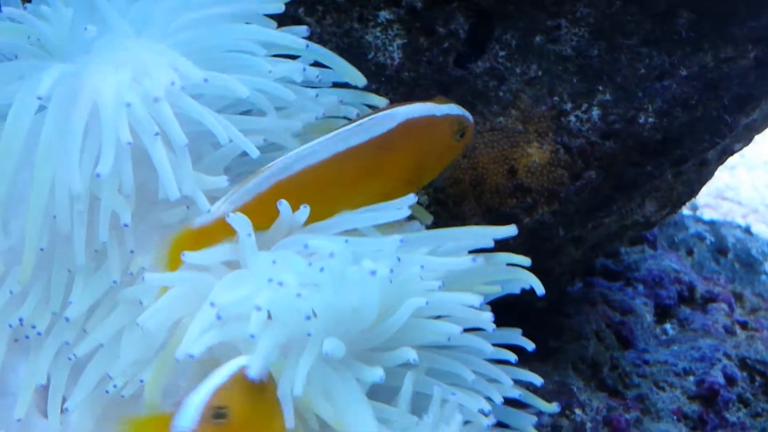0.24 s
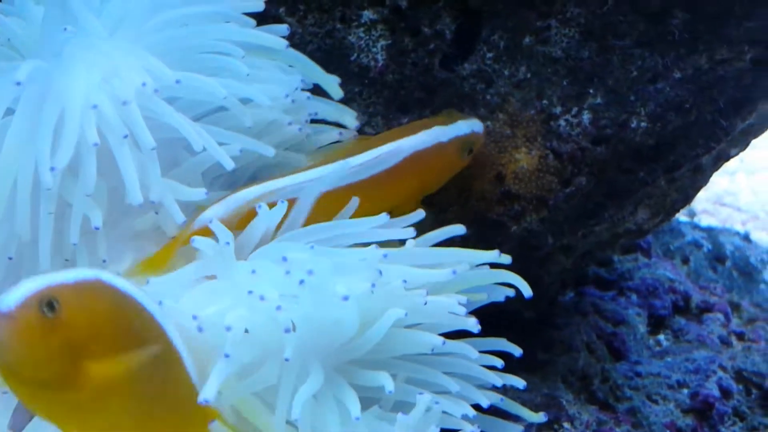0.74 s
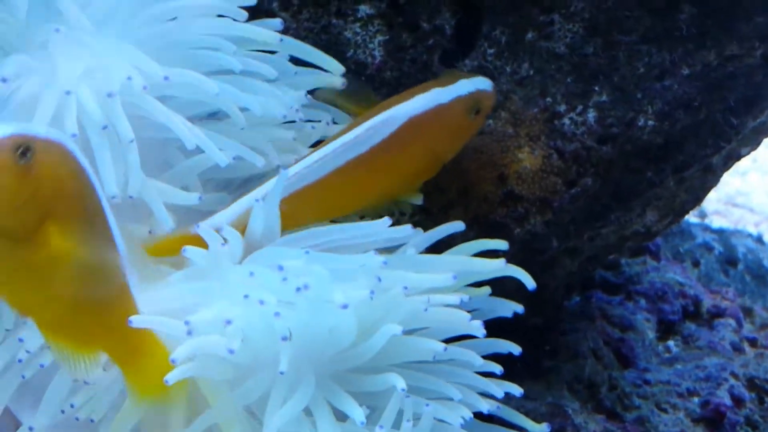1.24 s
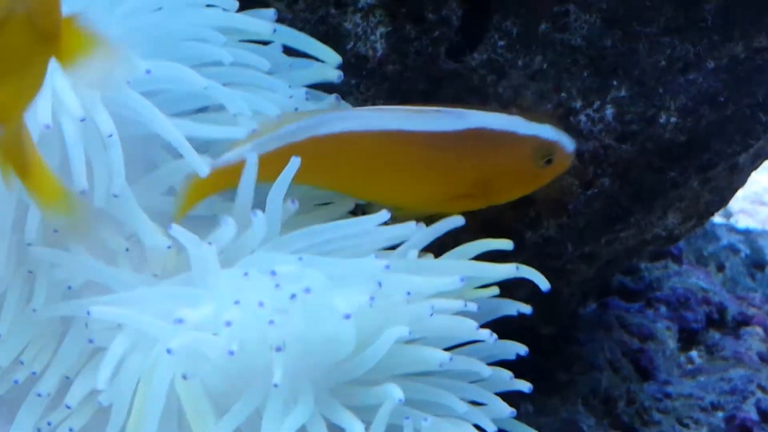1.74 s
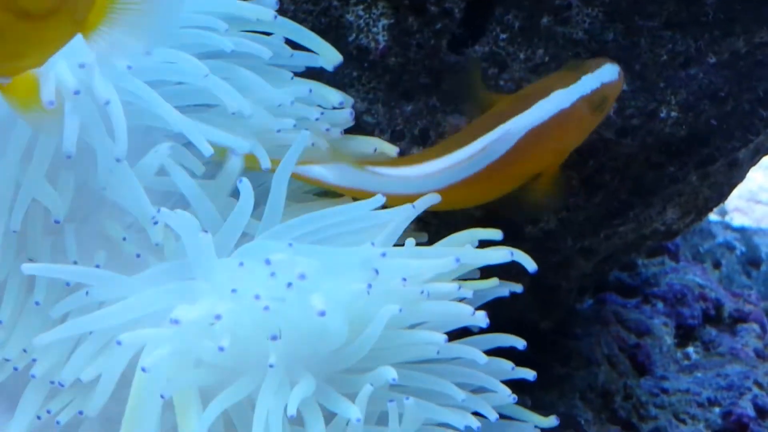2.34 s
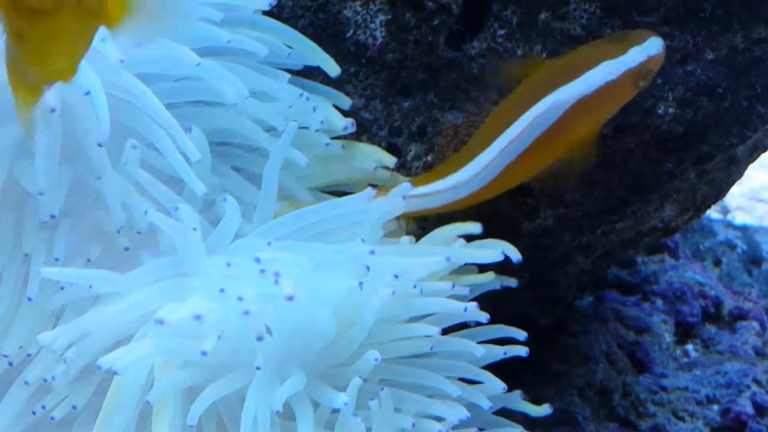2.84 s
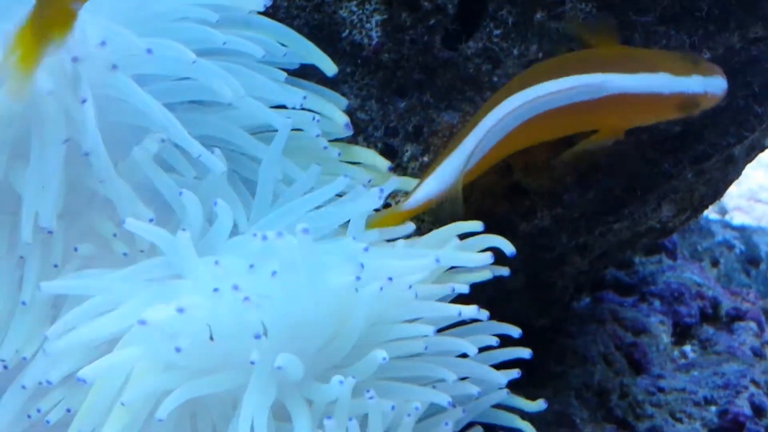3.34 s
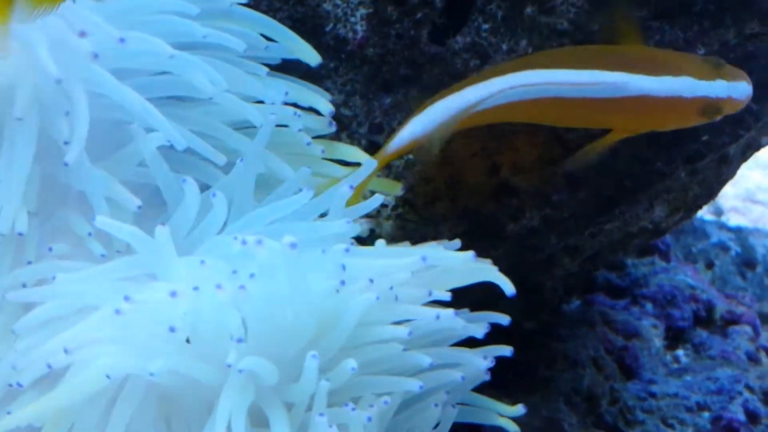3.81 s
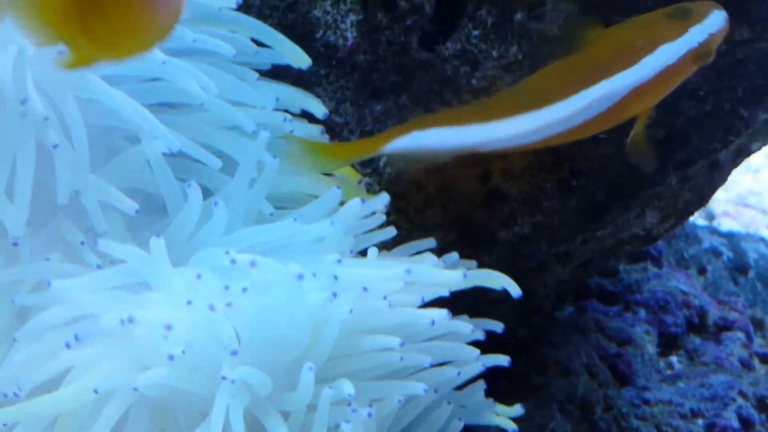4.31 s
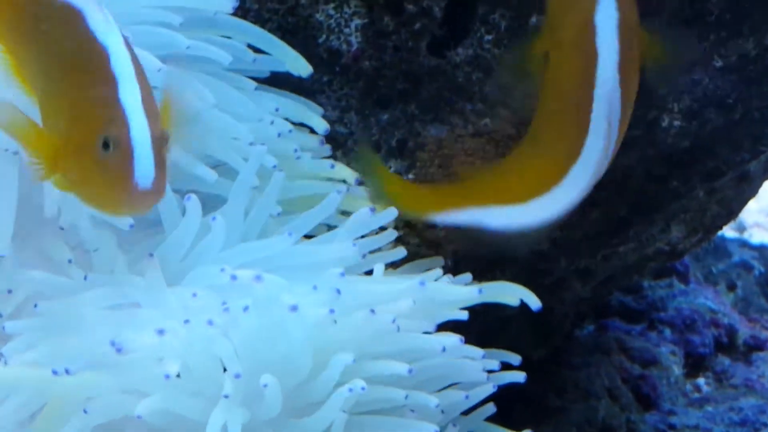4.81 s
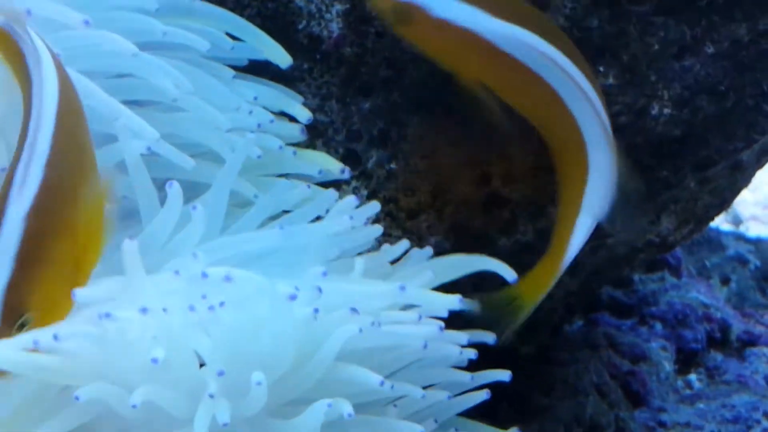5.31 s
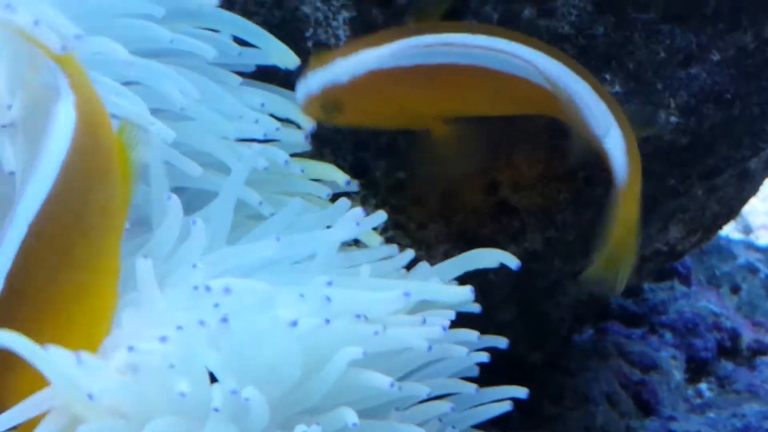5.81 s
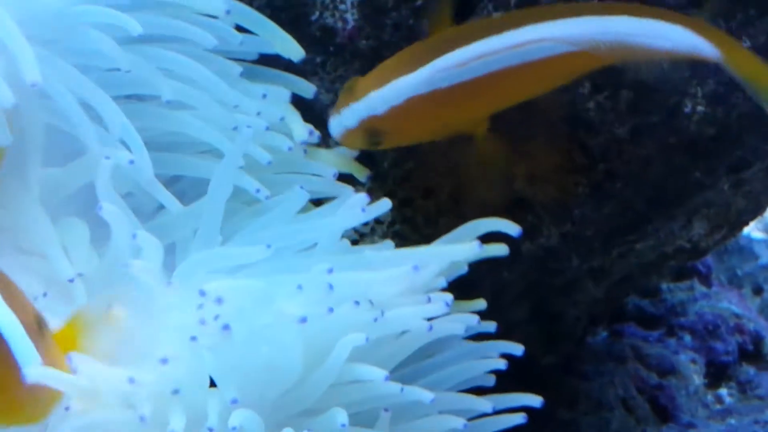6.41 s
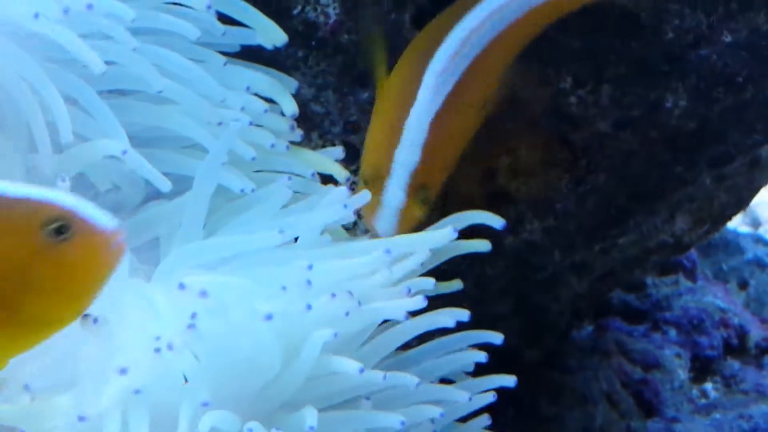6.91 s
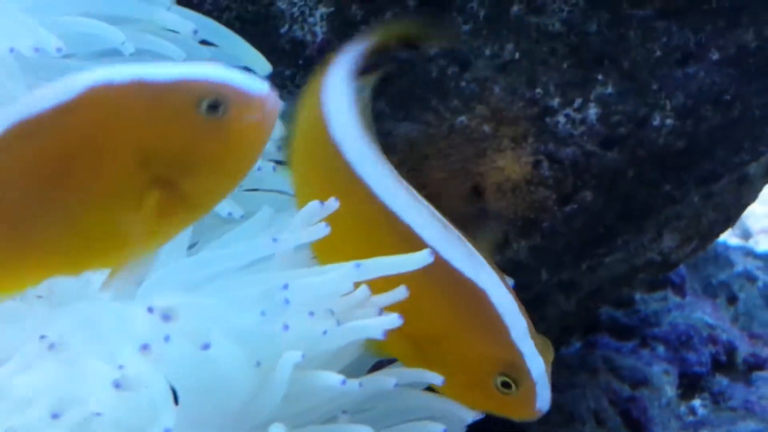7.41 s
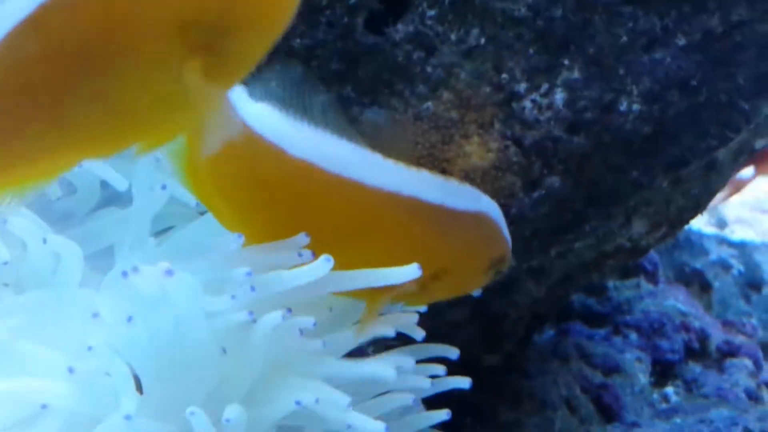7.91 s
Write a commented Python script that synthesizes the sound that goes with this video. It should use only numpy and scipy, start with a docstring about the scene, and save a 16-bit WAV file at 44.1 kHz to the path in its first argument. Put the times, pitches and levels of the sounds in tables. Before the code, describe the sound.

Sharp little clicks from a small mechanism sound near the microphone on the right, a few each second, in two uneven runs with a gap between. Behind them a fish tank's pump drones throughout, low and pulsing. Circulating water adds a soft rumble, a fine fizz and tiny scattered spits of spray, with a single faint bubble ping near the end of the first run. The pump and water carry on after the clicking ends.

```python
"""A running aquarium, up close

A mains pump hums, and the tank drones a few Hz above the hum's fourth harmonic, so the two throb.
Returning water rumbles, fizzes and spits at the surface, and one larger bubble pings faintly.
Close by on the right, a small mechanism makes dry little ticks as a part snaps inside its casing."""
import sys
import numpy as np
from scipy import signal
from scipy.fft import rfft, irfft
from scipy.io import wavfile

SR = 44100
rng = np.random.default_rng(int(sys.argv[2]) if len(sys.argv) > 2 else 0)


def master(y):
    """Save y as 16-bit WAV."""
    cut = np.clip(np.atleast_2d(y).T, -1, 1)
    pcm = np.round(cut * 32767)  # scale
    wavfile.write(sys.argv[1], SR, pcm.astype(np.int16))


N = 359415
TIME = np.arange(N) / SR
FREQ = np.maximum(np.arange(N // 2 + 1) * SR / N, 1)
MAINS_HZ, TOP_HZ = 50, 14600

# rumble of water in the pump and pipes: f/Hz, level/dB per Hz
RUMBLE_SPECTRUM = [(20, -95), (52, -81.5), (66, -70), (115, -69), (170, -62), (240, -63.5), (310, -70.5),
                   (380, -77.5), (560, -79.5), (660, -82), (1600, -82), (2100, -84.5), (3000, -90.5),
                   (6000, -108)]
# pitches at which the tank and its stand ring: f/Hz, width/Hz, left/dB per Hz, right/dB per Hz
TANK_RESONANCES = [(349.7, 7.7, -69.5, -64.5), (451.7, 11, -71, -69.5), (548.3, 14.3, -71, -72),
                   (1444, 36, -73.5, -90), (2359, 64, -87.5, -80.5)]
# fizz of the falling water: f/Hz, left/dB per Hz, right/dB per Hz
FIZZ_SPECTRUM = [(1000, -108, -108), (3380, -95, -93), (4700, -86, -92), (6200, -83.5, -91.5),
                 (6360, -86.5, -87), (8000, -97.5, -89), (9050, -100.5, -89), (10500, -103, -94.5),
                 (12900, -107, -100), (14700, -107, -101)]
# the loudest spits and gurgles: t/s, left level/dB, centre f/Hz, spread/Hz, length/s
LOUD_SPITS = [(0.18, -44, 5700, 800, 0.0089), (0.224, -37, 5600, 600, 0.0064),
              (1.996, -43, 5760, 1300, 0.038), (2.66, -40.5, 6210, 2200, 0.011),
              (2.896, -41, 5000, 2570, 0.034), (2.903, -45, 2800, 900, 0.022),
              (3.067, -41, 6200, 1300, 0.0089), (3.265, -47, 1950, 250, 0.0088),
              (3.446, -43, 1940, 300, 0.008), (3.923, -40.5, 5710, 750, 0.014),
              (4.12, -43, 5700, 3000, 0.013), (4.2, -44, 5500, 2200, 0.03), (4.29, -45.5, 5800, 2600, 0.04),
              (4.41, -47, 6000, 2400, 0.04), (4.905, -42.5, 5790, 500, 0.012),
              (5.758, -41, 5500, 1397, 0.012), (5.9, -45.5, 5900, 1700, 0.03),
              (6.339, -43, 5990, 1400, 0.011), (6.755, -40.5, 4700, 1616, 0.013),
              (6.865, -43.5, 5160, 2100, 0.017), (7.777, -43, 5660, 908, 0.013)]
# one larger bubble: t/s, level/dB, starting f/Hz, time to fade by 60 dB/s
BUBBLE_PING = (1.603, -43, 3250, .25)
# ticks of the mechanism: t/s, right level/dB over 1 ms, chatter/0-1, f/Hz that chatter brings out
TICK_EVENTS = [(0.0516, -18.5, 0.9, 7700), (0.3095, -16.5, 0.16, 6600), (0.5953, -18.5, 1, 7490),
               (0.8263, -17, 0.08, 6500), (1.0914, -18.0, 0.6, 7600), (1.2206, -17, 0.2, 5670),
               (1.7658, -16.5, 0.48, 9880), (3.6704, -16.6, 0.22, 5600), (3.9785, -17, 0.6, 9900),
               (4.2671, -17.5, 0.1, 6600), (4.5697, -16, 0.9, 7700), (4.7438, -18.5, 0.1, 6600),
               (5.0127, -16, 1, 7700), (5.2125, -19, 0.1, 5500), (5.4243, -17, 1, 7520),
               (5.778, -16.5, 0.15, 5500), (6.0488, -17, 1, 7700), (6.2245, -19.5, 0.07, 5500),
               (6.4317, -16.5, 0.75, 9200)]
# pitches at which the mechanism's casing rings: f/Hz, width/Hz, relative level/dB
CASING_RESONANCES = [(4730, 4000, -0.5), (6580, 330, -3.5), (8940, 1950, 4), (13200, 3700, 2.5)]
# how the soft low tone swells and fades: t/s, relative level/dB
LOW_TONE_LEVELS = [(0, -39), (.6, -46), (1.1, -49), (1.35, -41), (2.25, -51), (2.47, -40), (2.9, -39),
                   (3.5, -48), (3.95, -47), (4.15, -40), (4.45, -40), (4.75, -53), (5.26, -38), (5.85, -41),
                   (6.35, -50), (6.76, -42), (7.6, -47), (7.9, -40)]
# the pump's hum: multiple of the mains frequency, left/dB, right/dB, left phase lead/rad
HUM_HARMONICS = [(2, -44, -46.5, -0.26), (6, -52.5, -51, -0.7), (7, -68, -64.5, -1.3),
                 (8, -57, -60.5, -0.46), (9, -62.5, -65, -1), (10, -58.5, -57.5, -0.4),
                 (12, -68, -77, -1.1), (14, -68.5, -72, -0.6), (16, -60, -66, -0.69), (17, -66, -77, -1.9),
                 (18, -60.5, -62, -2.1), (20, -63.5, -63, -0.42), (22, -73, -66, 3.5),
                 (24, -65.5, -70.5, 1)]
# whines of the pump's rotor: f/Hz, left/dB, right/dB, left phase lead/rad
ROTOR_WHINES = [(304.8, -58, -58, -.1), (360, -63, -63, -.1), (609.7, -65, -69, -.6),
                (1067, -69, -64.5, -.4), (1219.5, -65, -71, -1.7), (1321, -72, -72, -1),
                (1372, -59, -78, -2.9), (1423, -66, -79, -1.8), (1635, -76, -72, -.9),
                (1981, -75, -68, -1.5)]
# throbs a second, which is how far the drone lies above the hum's fourth harmonic: t/s, f/Hz
THROB_RATES = [(0.0, 5.6), (0.25, 6.76), (0.4, 4.42), (0.53, 9.01), (0.82, 6.58), (1.49, 7.9), (1.61, 3.21),
               (2.67, 10.02), (2.83, 2.74), (3.2, 5.25), (3.34, 9.53), (3.75, 5.26), (3.88, 9.82),
               (4.25, 4.63), (4.37, 10.05), (6.04, 6.44), (6.34, 3.57), (6.6, 10.56), (7.4, 5.29),
               (7.87, 8.01), (8.0, 2.89), (8.15, 7.37)]
# how the tank's drone swells and fades: t/s, relative level/dB
DRONE_LEVELS = [(0, -46), (.25, -35), (.45, -39.5), (.9, -36.5), (1.55, -38.5), (1.75, -45), (2.5, -37.5),
                (3.06, -33), (3.3, -38), (3.9, -37.5), (4.07, -45), (4.5, -39.5), (4.61, -33), (4.75, -41),
                (5.37, -34.5), (5.55, -46), (6.1, -40.5), (7.27, -38.5), (7.47, -43), (7.75, -35),
                (8.15, -34.5)]


def undb(db):
    """Turn decibels into a number to multiply by."""
    return 10 ** (np.asarray(db) / 20)


def resonance(freq, hz, width):
    """How something that rings at hz responds to each frequency; the gain is 1 at hz."""
    return 1 / (1 + 1j * (freq ** 2 - hz ** 2) / (freq * width))


def gain_curve(hz, db):
    """Join points of frequency and level into a gain for every frequency."""
    return undb(np.interp(np.log(FREQ), np.log(hz), db))


def shaped(noise, gain):
    """Give white noise of power 1 a spectrum, with gain in amplitude per root Hz."""
    return irfft(rfft(noise) * gain, N) * np.sqrt(SR / 2)


def wander(rate):
    """A smooth random curve, about 1 in size, that changes about rate times a second."""
    spectrum = rfft(rng.standard_normal(N // 100))
    curve = irfft(spectrum / (1 + (FREQ[:N // 200 + 1] / rate) ** 4))
    return np.interp(TIME, np.linspace(0, TIME[-1], len(curve)), curve / curve.std())


def stereo_noise(alike_hz):
    """White noise whose left and right are alike for long waves and part ways above alike_hz."""
    mid, side = rfft(rng.standard_normal((2, N)))
    likeness = .96 / (1 + (FREQ / alike_hz) ** 3)
    mid, side = mid * np.sqrt((1 + likeness) / 2), side * np.sqrt((1 - likeness) / 2)
    return irfft(np.array([mid + side, mid - side]), N)


def room(sound, fade_s, echo_db):
    """Add a short wash of echoes from the hood and walls, different on each side."""
    t = TIME[:SR // 2]
    tail = rng.standard_normal((2, len(t))) * undb(-60 * t / fade_s)
    tail /= np.sqrt((tail ** 2).sum(1, keepdims=True))
    return sound + undb(echo_db) * signal.fftconvolve(sound, tail, axes=1)[:, :N]


def water_flow(alike_hz=850, lean_db=0.58, surge_db=0.75):
    """Churning water rumbles and keeps the tank ringing."""
    rumble = shaped(stereo_noise(alike_hz), gain_curve(*np.transpose(RUMBLE_SPECTRUM)))
    rumble *= undb([[-lean_db], [lean_db]])
    tank_gain = sum(undb([[left], [right]]) * resonance(FREQ, hz, 1.55 * width) ** 2
                    for hz, width, left, right in TANK_RESONANCES)
    ringing = shaped(stereo_noise(alike_hz), tank_gain)
    return (rumble + ringing) * undb(surge_db * wander(12.3))


def fizz(flurries_per_s=16, flurry_s=0.0073, flurry_db=1, surge_db=.5, flicker_db=1.8):
    """Tiny bubbles burst too thickly to count; each size comes in its own brief flurries."""
    spectrum, surge = 0, surge_db * wander(8.7)
    # one band of noise for each bubble size
    bands = np.array([abs(resonance(FREQ, hz, hz / 5)) ** 2 for hz in np.geomspace(2000, 15000, 12)])
    bands /= np.sqrt((bands ** 2).sum(0))
    age = TIME[:SR // 10] / flurry_s
    for band in bands:
        starts = (rng.random(N) < flurries_per_s / SR) * rng.random(N)
        flurries = signal.oaconvolve(starts, age * np.exp(1 - age))[:N]
        loudness = np.sqrt(1 + undb(flurry_db) ** 2 * flurries) * undb(surge + flicker_db * wander(38))
        spectrum = spectrum + rfft(loudness * rng.standard_normal((2, N))) * band
    bubbles = irfft(spectrum, N)
    hz, left_db, right_db = np.transpose(FIZZ_SPECTRUM)
    return shaped(bubbles / bubbles.std(), np.array([gain_curve(hz, left_db), gain_curve(hz, right_db)]))


def faint_spits(count=36, level_db=-47.8, scatter_db=1.5, centre_hz=6300, octaves=.22, length_s=.012):
    """List faint spits of spray at random moments, with the same columns as LOUD_SPITS."""
    times = (np.arange(count) + rng.random(count)) / count * TIME[-1]
    louder, higher, longer = rng.standard_normal((count, 3)).T
    hz = np.minimum(centre_hz * 2 ** (octaves * higher), TOP_HZ)
    return list(zip(times, level_db + scatter_db * louder, hz, .3 * hz, length_s * 1.3 ** longer))


def spits(right_db=-5, right_db_per_octave=14):
    """Each spit is a quick swarm of like-sized bubbles; the finest are loudest on the right."""
    out, t = np.zeros((2, N)), TIME[:SR // 2]
    freq = np.maximum(np.arange(len(t) // 2 + 1) * SR / len(t), 1)
    for at_s, db, hz, spread_hz, length_s in list(LOUD_SPITS) + faint_spits():
        noise = rng.standard_normal((2, len(t)))
        swarm = irfft(rfft(noise) * resonance(freq, hz, 1.14 * spread_hz) ** 2)
        age = t / (0.5 * length_s)
        swarm *= age * np.exp(1 - age) / swarm.std()
        start = max(int((at_s - 0.46 * length_s) * SR), 0)
        gain = undb([[db], [db + right_db + right_db_per_octave * np.log2(hz / 6000)]])
        out[:, start:start + len(t)] += (gain * swarm)[:, :N - start]
    return room(out, fade_s=0.83, echo_db=-10)


def bubble_ping(onset_s=0.0077, rise=.05, rise_s=.005, flutter_db=2.8):
    """A lone bubble chirps upward as it surfaces, then rings unevenly."""
    at_s, db, start_hz, fade_s = BUBBLE_PING
    age = np.maximum(TIME - at_s, 0)
    hz = start_hz * (1 + rise * (1 - np.exp(-age / rise_s)))
    loudness = undb(db - 60 * age / fade_s) * (1 - np.exp(-age / onset_s))
    ring = loudness * np.sin(2 * np.pi * np.cumsum(hz) / SR)
    return np.array([ring * undb(flutter_db * wander(60)) for side in range(2)])


def ticks(catch_s=0.0001693, rebound_s=0.000218, rebound=0.68, vary_db=2, knock_db=-5, left_db=-5):
    """A small part catches, snaps home and may chatter; its casing rings for about a millisecond."""
    out, size = np.zeros((2, N)), 512
    freq = np.maximum(np.arange(size // 2 + 1) * SR / size, 1)
    for at_s, db, chatter, ring_hz in TICK_EVENTS:
        # five blows: the catch, the snap and three bounces
        jitter = .25 * rng.standard_normal(3)
        delays = np.r_[0, catch_s, catch_s + rebound_s * (np.arange(1, 4) + jitter)]
        blows = np.r_[.2 + .4 * chatter, 1, chatter * rebound * .8 ** np.arange(3)]
        force = blows @ np.exp(-2j * np.pi * delays[:, None] * freq)
        casing = sum(undb(ring_db + vary_db * chatter * rng.normal()) * resonance(freq, hz, width)
                     for hz, width, ring_db in CASING_RESONANCES)
        # light, chattering blows lack the low pitches and favour one ring
        lowest_hz = np.interp(chatter, [0, .5], [2650, 5200])
        low_cut = resonance(freq, lowest_hz, lowest_hz) * 1j * freq / lowest_hz
        casing *= low_cut ** 2 * (1 + 2.3 * chatter * resonance(freq, ring_hz, width=750))
        # a clean snap sounds hollow in the middle of the treble
        casing *= 1 - .65 * (1 - chatter) ** 2 * resonance(freq, hz=7900, width=1200)
        # the whole casing kicks back with a faint knock
        knock = undb(knock_db) * (1 + 2.15 * chatter) * resonance(freq, hz=950, width=750)
        # the tick reaches the left through one resonance of the casing
        left = undb(left_db) * (casing * resonance(freq, hz=6200, width=900) + 0.61 * knock)
        right = casing + knock
        tick = irfft(force * np.array([left, right]) / np.sqrt(1 + (freq / TOP_HZ) ** 20))
        tick /= np.sqrt((tick[1] ** 2).sum() / (SR / 1000))
        start = int((at_s - catch_s) * SR)
        out[:, start:start + size // 2] += undb(db) * tick[:, :size // 2]
    return out


def low_tone(left_db=-4.3, right_db=-2.3, waver_db=1.6, drift_rad=.8):
    """A soft tone near three times the mains frequency wavers in level and pitch."""
    loudness = undb(np.interp(TIME, *np.transpose(LOW_TONE_LEVELS)) + waver_db * wander(5.3))
    phase = 2 * np.pi * 3 * MAINS_HZ * TIME + drift_rad * wander(3.1)
    return undb([[left_db], [right_db]]) * loudness * np.sqrt(2) * np.sin(phase)


def pump(waver_db=2.02, slip_s=.00005):
    """The pump hums at multiples of the mains and whines; its changing load shakes high tones most."""
    out, t = np.zeros((2, N)), TIME + slip_s * wander(2.3)
    hum = [(round(multiple) * MAINS_HZ, *rest) for multiple, *rest in HUM_HARMONICS]
    for hz, left_db, right_db, lead in hum + list(ROTOR_WHINES):
        phase = 2 * np.pi * (hz * t + rng.random())
        waver = undb(waver_db * min(hz / 400, 1.5) * wander(2.4))
        out[0] += undb(left_db) * waver * np.sin(phase + lead)
        out[1] += undb(right_db) * waver * np.sin(phase)
    return np.sqrt(2) * out


def tank_drone(hum_db=-40.6, usual_db=-39, follow=.25, trim_db=-.4, lean_db=.9, in_step_s=3.057):
    """The tank's drone and the pump's fourth harmonic slip in and out of step, which makes a throb."""
    throbs = np.cumsum(np.interp(TIME, *np.transpose(THROB_RATES))) / SR
    throbs -= np.interp(in_step_s, TIME, throbs)  # the tones line up here for the strongest throb
    cycles = 4 * MAINS_HZ * TIME
    db = np.interp(TIME, *np.transpose(DRONE_LEVELS)) + wander(6.8)
    hum = undb(hum_db + follow * (db - usual_db)) * np.sin(2 * np.pi * cycles)  # swells with the drone
    drone = undb(db + trim_db) * np.sin(2 * np.pi * (cycles + throbs))
    return undb([[-lean_db], [lean_db]]) * np.sqrt(2) * (hum + drone)


def scene():
    """Add up the humming, the water and the ticks, in stereo."""
    humming = pump() + low_tone() + tank_drone()
    water = water_flow() + fizz() + spits() + bubble_ping()
    return humming + water + ticks()


def record(dry):
    """Cut the treble steeply above TOP_HZ."""
    return signal.sosfilt(signal.ellip(10, .2, 70, TOP_HZ, fs=SR, output="sos"), dry)


dry = scene()
out = record(dry)
master(out)
```